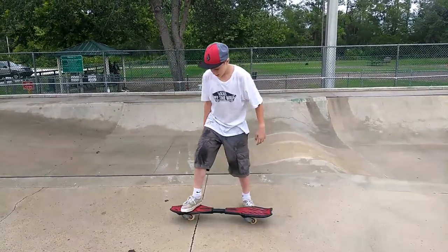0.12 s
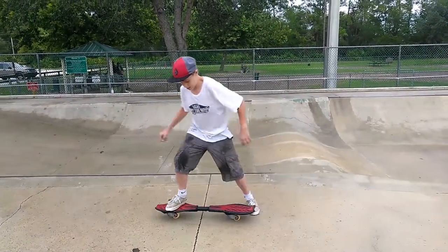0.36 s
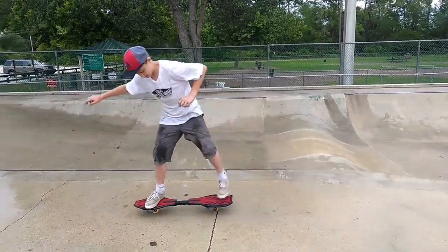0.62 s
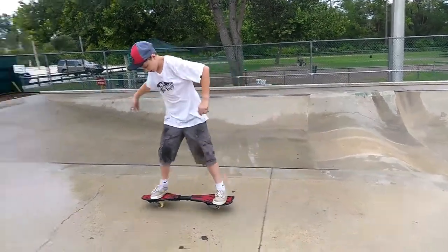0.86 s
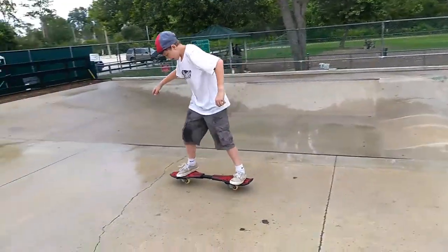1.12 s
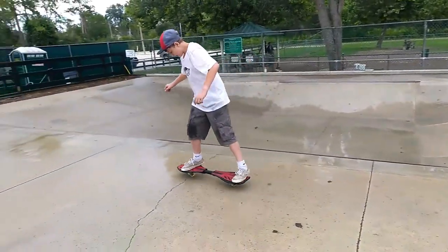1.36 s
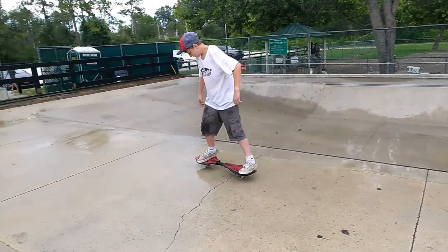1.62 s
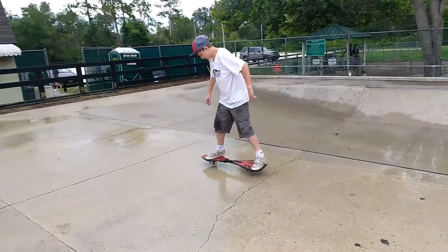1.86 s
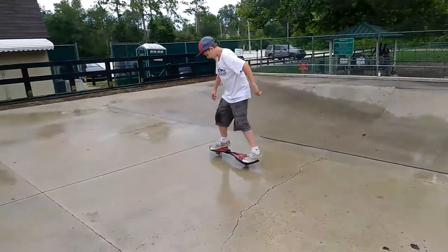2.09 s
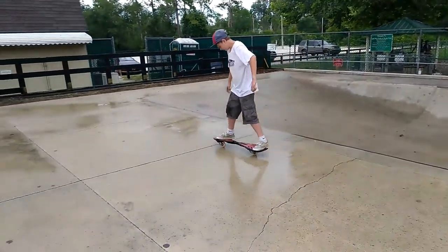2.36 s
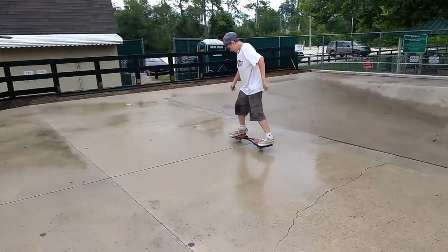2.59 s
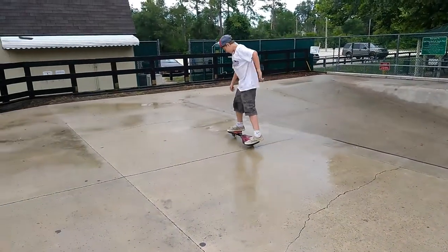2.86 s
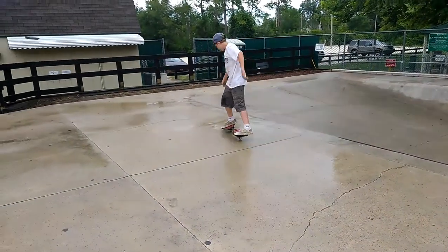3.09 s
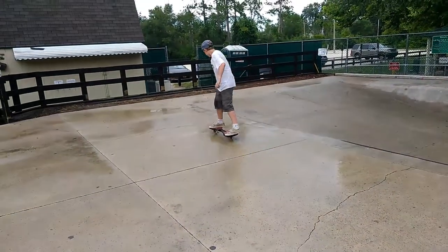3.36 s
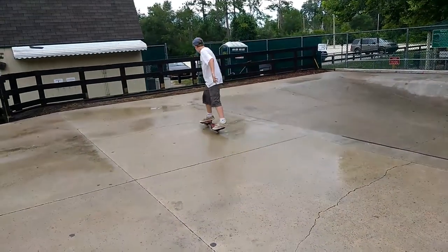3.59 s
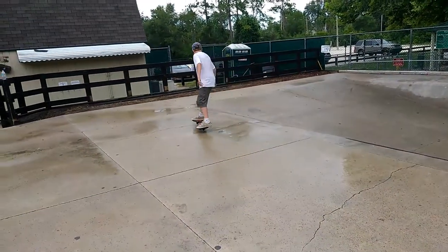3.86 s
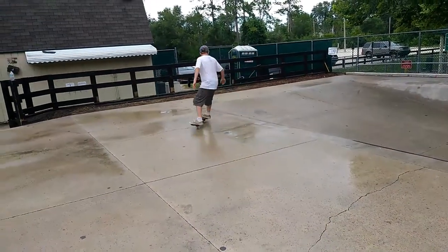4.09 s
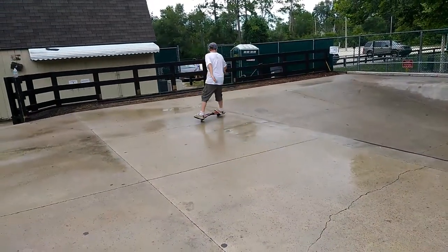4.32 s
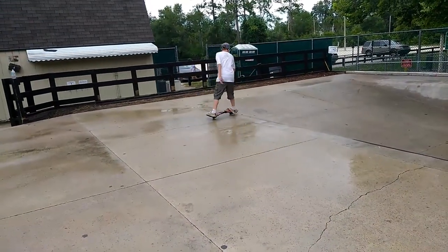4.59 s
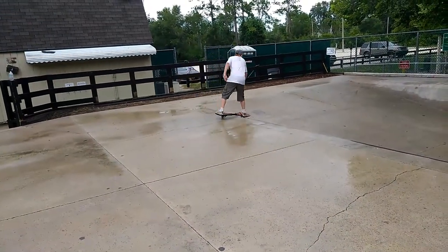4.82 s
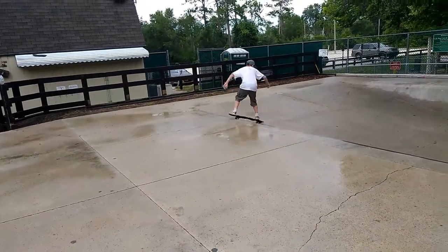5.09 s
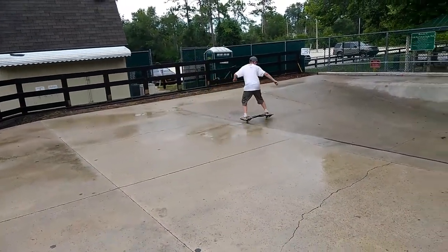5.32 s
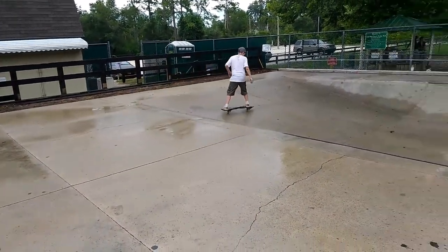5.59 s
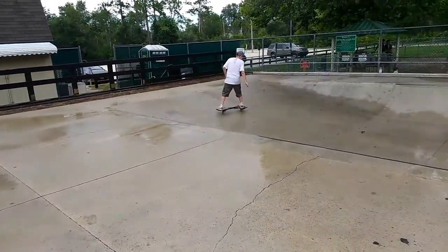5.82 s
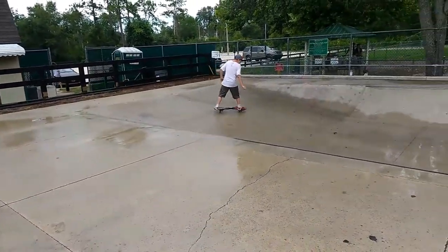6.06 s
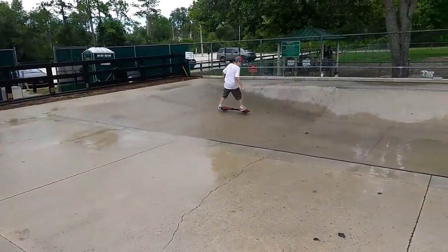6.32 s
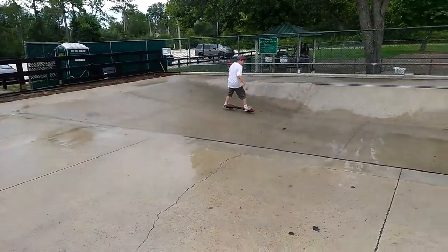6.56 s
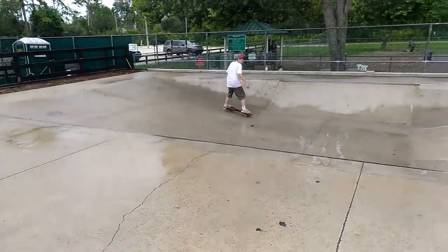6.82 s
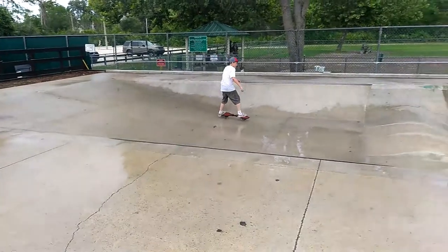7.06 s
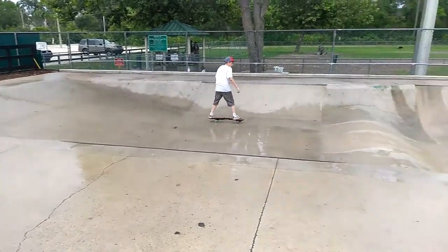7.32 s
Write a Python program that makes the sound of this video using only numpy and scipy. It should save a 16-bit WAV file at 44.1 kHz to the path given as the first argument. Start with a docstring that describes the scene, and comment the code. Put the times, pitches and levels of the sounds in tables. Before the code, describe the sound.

Small wheels spray across a wet skatepark: one loud hollow clack, a short skid squeak, then uneven bright hissing with faint knocks over distant traffic.

```python
"""Wet caster-board ride

Two small caster wheels roll over wet concrete: noise spray swells and thins, with pitched spurts and drops on top.
Resonant noise makes the wheels ring and the deck drone; short blows knock hubs and deck over joints.
As the rider steps on, the board clacks down and a tyre skids with a short stick-slip squeak.
Filtered noise makes far traffic and insects behind. The left port is bright near 10 kHz; the right is duller,
partly unrelated, of opposite polarity, and dips in level at times."""
import sys
import numpy as np
from scipy import signal
from scipy.fft import rfft, irfft, next_fast_len
from scipy.io import wavfile
from scipy.ndimage import uniform_filter1d, map_coordinates

SR = 44100
rng = np.random.default_rng(int(sys.argv[2]) if len(sys.argv) > 2 else 0)


def elevation(decibels):
    """Turn decibel levels (scalar or array-like) into linear amplitude ratios."""
    levels = np.asarray(decibels, float)
    return 10 ** (levels / 20)


def digitize_waveform(pressure):
    """Quantize a signal to 16-bit integers and store it at the path in sys.argv[1].

    Rows of a 2-D input are taken as channels; values are limited to [-1, 1].
    """
    field = np.atleast_2d(pressure).T
    bounded = np.clip(field, -1, 1)
    quanta = np.round(bounded * 32767).astype(np.int16)
    wavfile.write(sys.argv[1], SR, quanta)


N = 327663  # length in samples
REFERENCE_DB = -36  # spray level at which the coarse hiss and the deck drone have their base levels


def unit(x):
    """Scale to rms 1."""
    return x / np.sqrt(np.mean(x ** 2) + 1e-20)


def along(points, hz):
    """Read (Hz, value) points on a log frequency axis."""
    f, v = np.transpose(points)
    return np.interp(np.log(hz + 1), np.log(f + 1), v)


def curves(rows):
    """One value per sample for each column after the time."""
    s, *columns = np.transpose(rows)
    return [np.interp(np.arange(N) / SR, s, column) for column in columns]


def swells(rows):
    """Sum in dB of bumps (peak_s, swell_db, rise_s, fall_s) with a flat top and firm edges."""
    t = np.arange(0, N + 64, 64) / SR
    total = np.zeros(len(t))
    for peak, db, rise, fall in rows:
        side = np.where(t < peak, max(rise, 0.004), max(fall, 0.004))
        total += db * np.exp(-np.abs((t - peak) / side) ** 3)
    return np.interp(np.arange(N) / SR, t, total)


def wobble(rate):
    """A smooth random curve with rate knots a second."""
    knots = rng.standard_normal(int(N * rate / SR) + 4)
    return map_coordinates(knots, [np.arange(N) * rate / SR])


def filtered(x, response):
    """Multiply the spectrum of x by a complex response of frequency."""
    m = next_fast_len(N + 8192)
    return irfft(rfft(x, m) * response(np.fft.rfftfreq(m, 1 / SR)), m)[..., :N]


def colour(points):
    """Response of a spectrum table (Hz, dB)."""
    return lambda hz: elevation(along(points, hz))


def ringing(modes):
    """Causal response of resonances (Hz, width Hz, dB), alternating in sign."""
    def response(hz):
        total = 0
        for k, (centre, width, db) in enumerate(modes):
            mode = 1j * hz * width / (centre ** 2 - hz ** 2 + 1j * hz * width)
            total = total + (-1) ** k * elevation(db) * mode
        return total
    return response


def noise(response, lumps_db=0, lump_rate=1, patchy_db=0, grain=1):
    """Two unrelated noises, rms 1 together: shared fast lumps of level, separate patches of time and pitch."""
    z = signal.stft(rng.standard_normal((2, N)), nperseg=512)[2]
    field = uniform_filter1d(rng.standard_normal(z.shape), size=2, axis=1)
    field = uniform_filter1d(field, size=8, axis=2)
    patches = elevation(patchy_db * np.minimum(unit(field), 2))
    pair = signal.istft(z * patches, nperseg=512)[1][:, :N]
    lumps = elevation(lumps_db * wobble(lump_rate))
    return unit(filtered(pair * grain * lumps, response))


# the ride: time_s, spray_db, fineness_db (fine hiss over the spray), ring_db (wheel ring)
RIDE = [(0, -67.5, 7, -58), (.5, -55.5, 1.5, -49), (.79, -49, 4, -44.5), (.84, -27.5, 1, -44),
        (1.02, -32, -0.5, -52.5), (1.3, -33.5, -2, -48), (2.3, -36.5, -1.5, -49), (2.9, -37, -5, -49.5),
        (3.4, -32.5, 1.5, -53), (3.75, -43.5, 7, -54), (4.05, -27.5, 2, -52.5), (4.4, -35, 3, -58),
        (4.5, -42.5, -3, -49), (5.0, -43.5, -13, -54), (5.55, -38, -14, -48.5), (5.95, -41, -1.5, -48),
        (6.6, -47, 4.5, -36.5), (7.43, -39.5, 1, -56)]
# a wheel carves through standing water: peak_s, swell_db, rise_s, fall_s, fineness_drive_db (scaled per layer)
WATER_SURGES = [(0.576, 17.5, 0.02, 0.019, -11), (0.739, 14, 0.13, 0.041, -11), (.962, 4, 0.014, .015, -6),
                (0.99, 9.5, 0.034, 0.018, 7), (1.146, 7, 0.016, 0.017, 1), (1.18, 12, 0.019, .035, -5),
                (1.466, 2, 0.012, 0.011, 5), (1.724, 7, 0.033, 0.046, -1.5), (1.853, 5.5, 0.014, .012, 4.5),
                (1.937, 3.5, 0.013, 0.014, -2), (2.09, 6, 0.018, 0.065, -1.5), (2.36, 3.5, 0.026, 0.042, 4),
                (2.519, 9.5, 0.02, 0.046, -3.5), (2.639, 3, 0.025, 0.041, 2), (2.79, 3.5, 0.065, 0.05, 1),
                (2.913, 8.5, 0.017, 0.026, 0.5), (3.031, 2.5, 0.058, 0.04, 4.5), (3.19, 2, 0.016, 0.012, 3),
                (3.288, 1.5, 0.018, 0.044, 3), (3.342, 9, .03, .03, -6), (3.399, 0.5, 0.041, 0.045, -3),
                (3.562, 10.5, 0.015, 0.11, -7), (3.958, 6, 0.03, 0.015, -0.5), (4.58, 1, 0.0058, 0.034, 7),
                (5.098, 5, 0.11, .07, -1.5), (5.342, 3.5, 0.058, 0.028, -2), (5.44, 10, 0.059, 0.035, -3),
                (5.798, 4.5, 0.038, 0.09, -3), (7.001, 0, 0.025, 0.0072, 2), (7.21, 8, 0.057, .06, -3)]
# the wheels are unloaded for a moment: quietest_s, loss_db, fade_s, return_s
WHEEL_LIFTS = [(.635, 9, 0.04, 0.065), (.785, 9.5, .015, 0.012), (1.03, 3.5, 0.009, 0.032),
               (1.36, 14, 0.04, 0.031), (1.44, 7, 0.026, 0.0073), (2.062, 15, 0.065, 0.0081),
               (2.87, 3.5, 0.03, 0.018), (2.945, 6.5, 0.021, .02), (3.145, 7, .04, 0.025),
               (3.47, 14, 0.036, 0.052), (3.8, 9.5, 0.024, 0.036), (3.99, 3.5, 0.017, 0.026),
               (5.92, 5, 0.039, 0.048)]


def wetness():
    """Spray level in dB: the ride, its surges in deeper water, and its losses as the wheels lift."""
    return curves(RIDE)[0], swells([row[:4] for row in WATER_SURGES]), swells(WHEEL_LIFTS)


# the wheel ring flares, often with a tyre scrub in a hard turn:
# peak_s, swell_db, rise_s, fall_s, scrub_drive_db (scaled per layer)
RING_FLARES = [(.87, 6, .03, 0.034, 11.5), (.97, 14, 0.045, 0.04, 15), (1.2, 9.5, 0.063, 0.026, 12),
               (1.92, 4.5, 0.21, 0.043, 5), (2.44, 5, 0.15, 0.028, 6.5), (3.08, 5.5, 0.18, 0.068, 4),
               (3.36, 0, 0.12, 0.041, 10), (3.64, 7, 0.073, 0.11, 6), (4.3, -3, 0.18, 0.13, 13),
               (4.86, 6.5, 0.019, 0.11, 1.5), (5.075, 7.5, 0.047, 0.12, 8.5),
               (5.443, 12.5, 0.018, 0.031, 5), (5.6, 2, 0.22, 0.048, 4), (6.3, 0, 0.44, 0.1, 3),
               (7.18, 11, 0.13, 0.075, -0.5), (7.42, 13.5, 0.082, .05, -4)]


def flares():
    """Swell of the wheel ring and drive of the tyre scrub, dB."""
    ring = swells([row[:4] for row in RING_FLARES])
    scrub = swells([(s, db, rise, fall) for s, _, rise, fall, db in RING_FLARES])
    return ring, scrub


def drops():
    """Gain that lifts the hiss for about a millisecond at each bursting drop."""
    drops_per_s, base_db, spread_db, most_db, peak_s = 330, -4.5, 0.5, 2, 0.00076 / 2
    draw = rng.random((2, N))
    size_db = np.minimum(base_db - spread_db * np.log(1 - draw[1]), most_db)
    hits = (draw[0] < drops_per_s / SR) * elevation(size_db)
    u = np.arange(400) / SR / peak_s
    return 1 + np.convolve(hits, 2 * u * np.exp(-u))[:N]


# spray spectra at the left port, coarse to fine: pitch_hz, level_db (per Hz, relative)
COARSE_HISS = [(2000, -102), (3400, 7.5), (4030, 8.5), (4580, 10.5), (5300, 5.5), (6300, 6), (7500, 4.5),
               (10100, 7), (17200, -120)]
MAIN_SPRAY = [(4240, -29.5), (7500, -12), (8000, -1.5), (8660, 4), (10000, 5), (12500, -17.5),
              (22000, -120)]
FINE_HISS = [(7000, -26.5), (10200, 9.5), (11200, 12.5), (13700, -4.5), (15000, -17), (15500, -30)]
MIST_SPECTRUM = [(9000, -18), (12000, -2), (13300, -4), (13900, 0), (15000, -6.5), (15700, -8),
                 (16000, -42)]
# mist thrown up behind the wheels: time_s, level_db
MIST_RIDE = [(0, -64), (.8, -50), (1.9, -50), (3.0, -52.5), (3.9, -68), (4.4, -58), (5.3, -53.5),
             (6.0, -49), (6.6, -46), (7.43, -46.5)]


def spray():
    """Droplets torn off the tyres come in clumps of a few milliseconds; deeper water changes their fineness."""
    ride, surges, lifts = wetness()
    fineness = curves(RIDE)[1]
    finer = swells([(s, db, rise, fall) for s, _, rise, fall, db in WATER_SURGES])
    flutter = 0.62 * wobble(30) + 1.05 * wobble(90)  # dB, uneven by chance
    burst = unit(drops())

    # the coarse hiss takes only shares of the swings
    coarse_db = -45 + 0.14 * (ride - REFERENCE_DB) + 0.034 * surges - 0.94 * lifts
    coarse_db += 0.72 * flares()[1] + 0.59 * flutter
    main_db = ride + surges - lifts + flutter
    mist_db = curves(MIST_RIDE)[0] + surges - lifts + 1.8 * finer + flutter
    fine_db = main_db + fineness + 1.38 * finer

    def fine_response(hz):
        return colour(FINE_HISS)(hz) / (1 + (hz / 13900) ** 24)  # steep upper edge of this layer

    sound = elevation(coarse_db) * noise(colour(COARSE_HISS), lumps_db=2.5, lump_rate=330, patchy_db=4)
    sound += elevation(main_db) * noise(colour(MAIN_SPRAY), lumps_db=1, lump_rate=350, patchy_db=3.5, grain=burst)
    sound += elevation(mist_db) * noise(colour(MIST_SPECTRUM), lumps_db=2.5, lump_rate=240, patchy_db=3)
    sound += elevation(fine_db) * noise(fine_response, lumps_db=1, lump_rate=230, patchy_db=3.5, grain=burst)
    return sound


# the loudest splashes from under a wheel: time_s, level_db (before the puff shape), pitch_hz (before the climb)
LOUD_SPLASHES = [(.53, -33, 9700), (.8052, -11, 8920), (.807, -14, 8750), (.8092, -15, 9000),
                 (.8115, -17, 9250), (.826, 0, 8520), (.8275, -8, 8040), (1.135, -16, 9550),
                 (1.1498, -7.5, 9700), (1.17, -9, 9300), (1.1824, -8, 10500), (1.3832, -20, 10700),
                 (1.3908, -15, 9000), (1.3928, -14, 10100), (1.3978, -17, 9000), (1.4012, -7, 10000),
                 (1.4092, -12, 8300), (1.4125, -7, 8800), (1.4145, -3.5, 8040), (1.4178, -17, 9600),
                 (1.421, -9, 10000), (1.675, -27, 10000), (1.7145, -12.5, 10500), (1.718, -11, 10600),
                 (1.726, -18, 10800), (1.8445, -17, 10300), (1.935, -20, 10200), (2.057, -33, 10500),
                 (2.081, -21, 8800), (2.508, -17, 9500), (2.545, -16, 10500), (2.848, -27, 10200),
                 (3.02, -13, 10700), (3.056, -18.5, 10600), (3.486, -25.5, 9700), (3.534, -20, 9000),
                 (3.5474, -11, 10000), (3.5514, -14, 10400), (3.5644, -18, 10400), (3.573, -11, 10400),
                 (3.794, -20.5, 10400), (3.846, -21, 9900), (3.954, -18, 10700), (4.034, -14, 10100),
                 (4.0615, -15, 10400), (4.068, -10.5, 9200), (4.115, -25, 8500), (4.157, -18, 10000),
                 (4.207, -16, 9600), (4.243, -21, 10000), (4.255, -15, 10600), (4.297, -14, 10000),
                 (4.345, -16, 10500), (5.3408, -20, 7960), (5.4091, -16, 7900), (5.4296, -18, 8000),
                 (5.676, -26, 11000), (5.762, -24, 8930)]


def splashes(count=60):
    """A spurt is a puff of pitched noise over broad fizz, climbing as it thins; small ones fall where it is wet."""
    length_s, attack_s, climb_hz_per_s = 0.0025, 0.0011, 330000
    ride, surges, lifts = wetness()
    level = ride + surges - lifts
    chance = np.cumsum(elevation(level))
    draw = rng.random((count, 3))
    at = np.searchsorted(chance, draw[:, 0] * chance[-1])
    small_db = level[at] - 1.5 + 6 * draw[:, 1]
    small_hz = 10400 + 1200 * (draw[:, 2] - 0.5)

    t = np.arange(2048) / SR
    hz = np.fft.rfftfreq(2048, 1 / SR)
    body = np.exp(-(t / length_s) ** 3)  # stops abruptly
    tail = 0.11 * elevation(-60 * t / 0.036)
    puff = (body + tail) * (1 - np.exp(-t / attack_s))
    shift_hz = climb_hz_per_s * np.minimum(t, 2 * length_s)
    climb = np.exp(2j * np.pi * np.cumsum(shift_hz) / SR)

    out = np.zeros((2, N + 4096))
    for s, db, pitch_hz in [*LOUD_SPLASHES, *zip(at / SR, small_db, small_hz)]:
        shape = ringing([(pitch_hz, 2600, 0)])(hz) ** 3 + elevation(-39) * (hz > 3000)
        fizz = unit(irfft(rfft(rng.standard_normal((2, 2048))) * shape))
        fizz = np.real(signal.hilbert(fizz) * climb)
        start = max(round(s * SR) - 30, 0)  # begins 30 samples early
        out[:, start:start + 2048] += fizz * elevation(db) * puff
    return out[:, :N]


# resonances of the wheel hubs, the deck and grit under a sliding tyre: pitch_hz, width_hz, level_db
WHEEL_MODES = [(3172, 313, 5.5), (2840, 1400, -10.5)]
DECK_MODES = [(658, 178, 2.5), (877, 555, 2.5), (1400, 1500, -10.5)]
GRIT_MODES = [(1660, 200, 6.5), (1980, 200, 7.5), (2920, 510, 12)]


def rolling():
    """Rough concrete shakes the wheel hubs and the deck; a scrubbing tyre adds a rasp of grit."""
    ride, _, lifts = wetness()
    flare, scrub = flares()
    ring_db = curves(RIDE)[2] + flare - 0.77 * lifts
    rasp_db = -73.5 + 2.3 * scrub - lifts
    drone_db = -55 + 0.12 * (ride - REFERENCE_DB - lifts) + wobble(15)
    hubs = noise(lambda hz: ringing(WHEEL_MODES)(hz) ** 2, lumps_db=2, lump_rate=130, patchy_db=2.5)
    rasp = noise(ringing(GRIT_MODES), lumps_db=3, lump_rate=320)
    deck = noise(ringing(DECK_MODES), lumps_db=1, lump_rate=110, patchy_db=4.5)
    return elevation(ring_db) * hubs + elevation(rasp_db) * rasp + elevation(drone_db) * deck


# wheel and deck knocks: start_s, drive_db (before the resonances), ring_db and crack_db (over the drive),
# contact_s (decay of the blow)
KNOCKS = [(0.807, -44, 7, -3, 0.012), (0.8259, -36, 28, 14, 0.0035), (1.411, -41, 17.5, 7, 0.0073),
          (1.421, -43.5, -1, 10, 0.0033), (1.521, -49, 14, -7, 0.017), (1.848, -47.5, -2, -4, 0.014),
          (2.057, -41, 7, -7, 0.0045), (2.097, -45.5, -7, -3, 0.013), (2.946, -43.5, -12, -4, 0.026),
          (4.007, -50, 8, 2.5, 0.13), (5.001, -62.5, -7, 18, 0.0061), (5.26, -50.5, 4, 2, .015),
          (5.417, -51, -6, 9.5, 0.024), (5.8, -54, -11, -2, 0.029), (6.36, -50, -2, 1, 0.026),
          (6.866, -56, -5, -9, .045), (7.168, -53.5, 27.5, -3, 0.043), (7.29, -56, -7, -16, 0.051)]


def knocks():
    """A blow or short clatter of noise excites deck, hubs and a bare crack."""
    deck, hubs, crack = np.zeros((3, 2, N + 2048))
    t = np.arange(2048) / SR
    for s, db, ring_db, crack_db, contact_s in KNOCKS:
        contact = (1 - np.exp(-t / 0.00038)) * np.exp(-(t / contact_s) ** 0.92)
        blow = rng.standard_normal((3, 2, 2048)) * contact
        blow[..., 4] += 5  # the first touch is one sharp click
        at = slice(round(s * SR), round(s * SR) + 2048)
        deck[:, at] += blow[0] * elevation(db + 22)
        hubs[:, at] += blow[1] * elevation(db + ring_db + 8)
        crack[:, at] += blow[2] * elevation(db + crack_db + 14.5)

    def thud(hz):
        modes = [*DECK_MODES, (690, 45, 4), (230, 150, -3), (115, 70, -2)]
        return ringing(modes)(hz) / (1 + 1j * hz / 1500)  # soft tyres keep it dull

    snap = ringing([(2010, 550, 1), (4600, 3700, -5.5), (6070, 790, 6.5)])
    return filtered(deck, thud) + filtered(hubs, ringing(WHEEL_MODES)) + filtered(crack, snap)


# resonances of the struck deck: pitch_hz, width_hz, level_db
BOARD_MODES = [(760, 80, 10), (1020, 110, 8), (1360, 120, 4), (640, 45, 6), (240, 110, -2), (115, 60, -3)]
# clean blows on the deck: start_s, drive_db (before the resonances)
DECK_BLOWS = [(0.804, -15), (.8258, 0), (1.4135, -10), (1.424, -17), (2.057, -17), (2.098, -22),
              (2.947, -17)]


def blows():
    """A single-sample push rings the deck."""
    push = np.zeros(N)
    for s, db in DECK_BLOWS:
        push[round(s * SR)] = elevation(db)
    return filtered(push, lambda hz: ringing(BOARD_MODES)(hz) / (1 + 1j * hz / 2500))


# tyre skid: time_s, slip_hz, squeak_db, octave_share (0-1, squeak moved to twice the slip rate)
SKID_PATH = [(.875, 301, -50, 0.6), (.9, 352, -28.5, 0.85), (.918, 371.5, -33, 0.9), (.937, 407, -31, 0.66),
             (.956, 411.3, -41, 0.6), (.976, 359, -30, 0.6), (.997, 320, -37, 0.4), (1.018, 286, -46, .7)]
# strokes of the skid's grit: peak_s, swell_db, rise_s, fall_s
GRIT_STROKES = [(.903, 7.5, 0.014, 0.023), (.955, 7, 0.018, 0.015), (.993, 9.5, .02, 0.016)]


def skid():
    """The tyre sticks and slips; the rate follows the sliding speed, and each slip throws out grit."""
    slip_hz, squeak_db, share = curves(SKID_PATH)
    share = np.clip(share, 0, 1)
    phase = 2 * np.pi * np.cumsum(slip_hz * (1 + 0.0036 * wobble(170))) / SR
    t = np.arange(N) / SR
    fade_in = np.clip((t - SKID_PATH[0][0]) / 0.0037, 0, 1)
    fade_out = np.clip((SKID_PATH[-1][0] - t) / 0.0084, 0, 1)

    octave = share * elevation(1.6 * wobble(62)) * np.sin(2 * phase)
    tone = 2 ** 0.5 * elevation(squeak_db) * ((1 - share) * np.sin(phase) + octave)
    for k in (4, 5, 6):  # faint edge of overtones
        tone += elevation(squeak_db - 18 + 4 * wobble(50)) * np.sin(k * phase)

    slips = np.exp(0.29 * np.cos(phase))
    scrape = unit(slips * noise(ringing(GRIT_MODES), lumps_db=2.5, lump_rate=140))
    return fade_in * fade_out * (tone + elevation(-43.5 + swells(GRIT_STROKES)) * scrape)


def sand(count=900):
    """Single grains tick under the rolling wheels from the first knock on, through tyre and hub."""
    drive_db, spread_db = -40, 3  # before the resonances
    draw = rng.random((count, 3))
    start = round(KNOCKS[0][0] * SR)
    at = start + (draw[:, 0] * (N - start)).astype(int)
    ticks = np.zeros(N)
    ticks[at] = np.sign(draw[:, 1] - 0.5) * elevation(-spread_db * np.log(1 - draw[:, 2]))
    hub = ringing([(2000, 900, 1), (3200, 650, -2), (5100, 2000, -10)])
    return filtered(ticks * elevation(drive_db - wetness()[2]), hub)


# far traffic: time_s, rumble_db, murmur_db (distant tyres)
FAR_TRAFFIC = [(0, -43.5, -46), (.7, -45, -48.5), (1.5, -43, -54), (2.6, -41.5, -58), (3.3, -43.5, -54.5),
               (3.9, -43.5, -62.5), (4.3, -46.5, -58), (4.6, -42, -51), (4.95, -42.5, -59),
               (5.3, -43.5, -50), (5.6, -42.5, -59), (5.9, -41.5, -57.5), (6.25, -42, -52.5),
               (6.6, -45.5, -50.5), (7.43, -44, -51.5)]
# traffic spectra at the left port: pitch_hz, level_db (per Hz, relative)
RUMBLE_SPECTRUM = [(15, -47), (27, -33), (46, -2.5), (70, 1), (168, -11), (221, -10), (425, -22.5),
                   (500, -21), (650, -29), (1100, -120)]
MURMUR_SPECTRUM = [(240, -39), (400, -10), (545, 9.5), (641, 6.5), (1480, 2), (2460, 4), (2800, 12),
                   (3640, -68), (6160, -120)]
# insect band: pitch_hz, width_hz, level_db
INSECT_BAND = [(6330, 220, 0)]


def surroundings():
    """Far traffic rumbles and murmurs as broad noise; insects hiss in a narrow band."""
    rumble_db, murmur_db = curves(FAR_TRAFFIC)
    sound = elevation(rumble_db) * noise(colour(RUMBLE_SPECTRUM), lumps_db=1.03, lump_rate=16, patchy_db=2.5)
    sound += elevation(murmur_db) * noise(colour(MURMUR_SPECTRUM), patchy_db=5.5)
    insects = noise(lambda hz: ringing(INSECT_BAND)(hz) ** 2, patchy_db=4)
    return sound + elevation(-55) * insects


# right port's loss under the left: pitch_hz, loss_db
RIGHT_LOSS = [(60, 0.98), (200, 3.3), (770, 3.7), (1200, 5.6), (2000, 7.5), (2600, 14.4), (3200, 19.7),
              (4200, 8.6), (6400, 10), (7600, 19), (8600, 35), (11000, 39), (12500, 21.5), (14800, 11),
              (15600, 6)]
# right port's likeness to the left: pitch_hz, likeness (0-1)
RIGHT_LIKENESS = [(60, 0.95), (270, 0.9), (700, 0.43), (1500, 0.071), (3000, 0.68), (6000, 0.12),
                  (12000, 0.13)]
# short level dips of the right port: quietest_s, loss_db, fade_s, return_s
RIGHT_DIPS = [(.45, 6.5, .2, 0.4), (3.92, 8.5, 0.083, 0.088), (4.55, 6.5, 0.07, 0.042),
              (5.07, 5, 0.11, 0.55), (5.7, 6, 0.13, 0.1), (6.06, 10, 0.12, 0.078)]


def right_port(left, other):
    """Duller and inverted, part like the left and part unrelated; above a knee it hears the sound first."""
    knee_hz, lead_s = 3630, 8 / SR

    def port(hz):
        like = np.clip(along(RIGHT_LIKENESS, hz), 0, 1)
        early = np.exp(2j * np.pi * np.maximum(hz - knee_hz, 0) * lead_s)
        return -elevation(-along(RIGHT_LOSS, hz)) * early * np.array([like, np.sqrt(1 - like ** 2)])

    return filtered(np.array([left, other]), port).sum(0) * elevation(-swells(RIGHT_DIPS))


def scene():
    """Sum all sources at the left port and derive what the right port hears."""
    left, other = spray() + splashes() + rolling() + knocks() + blows() + skid() + sand() + surroundings()
    return np.array([left, right_port(left, other)])


def top_cut(x):
    """Nothing passes above the cut-off."""
    return signal.sosfilt(signal.butter(12, 15740, fs=SR, output="sos"), x)


def record(dry):
    """Each channel adds its own faint hiss; the loudest peaks flatten smoothly below full scale."""
    hiss = elevation([[-60], [-66]]) * noise(colour([(2000, -36), (8000, -12), (15000, -5)]))
    x = dry + hiss
    mix = x / (1 + np.abs(x) ** 8) ** (1 / 8)
    return top_cut(mix)


dry = scene()
out = record(dry)
digitize_waveform(out)
```